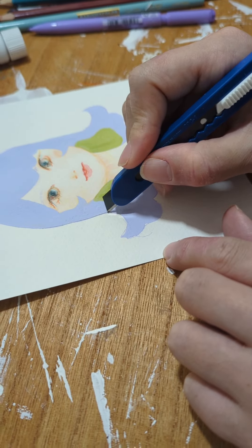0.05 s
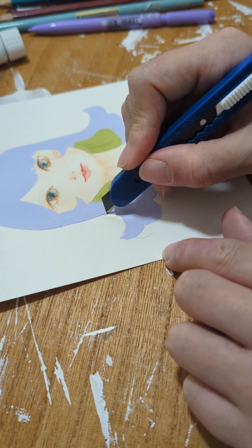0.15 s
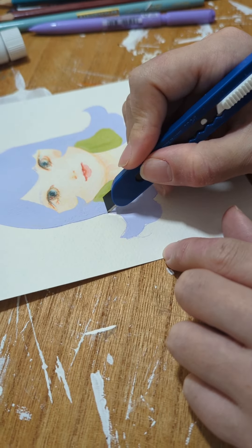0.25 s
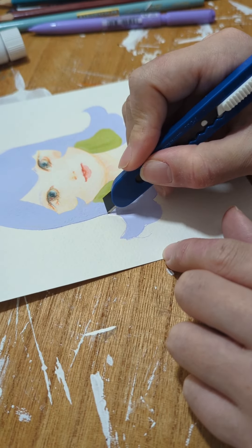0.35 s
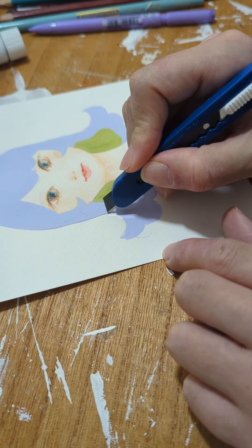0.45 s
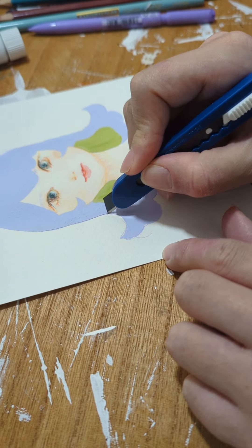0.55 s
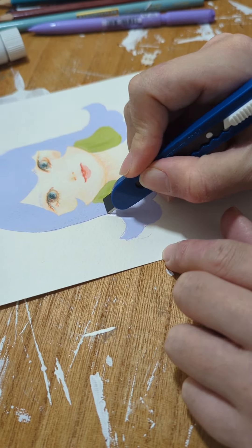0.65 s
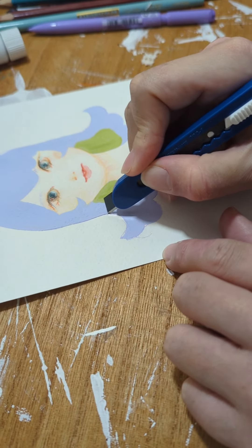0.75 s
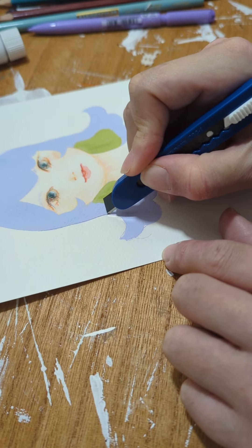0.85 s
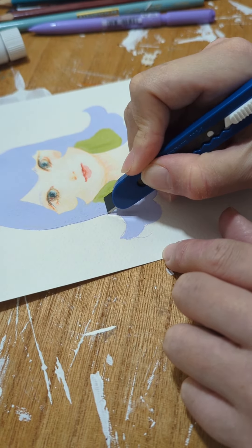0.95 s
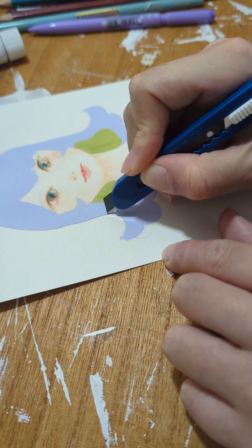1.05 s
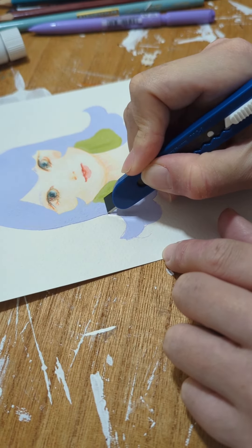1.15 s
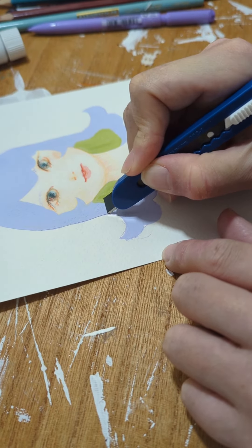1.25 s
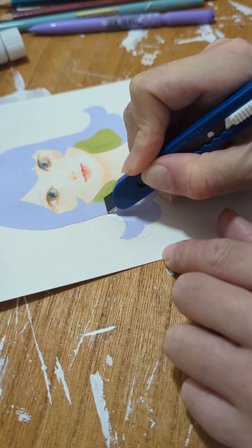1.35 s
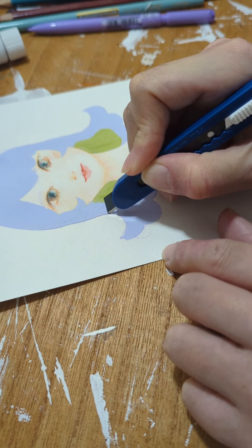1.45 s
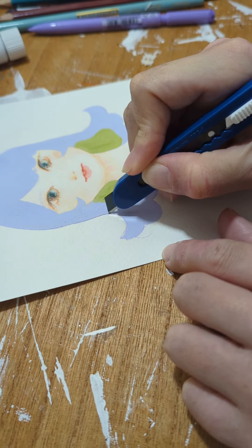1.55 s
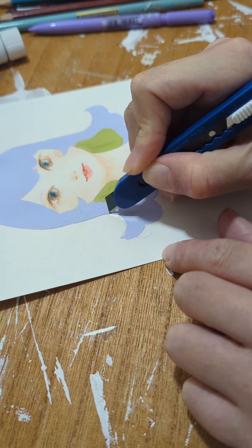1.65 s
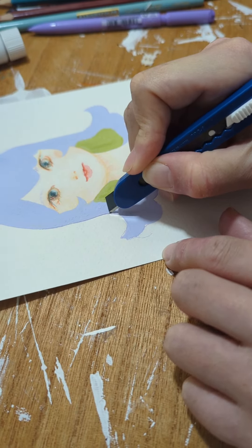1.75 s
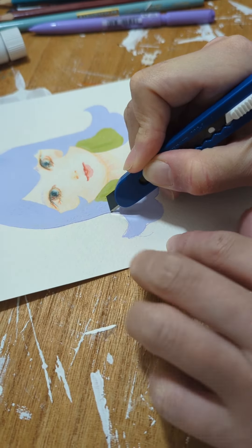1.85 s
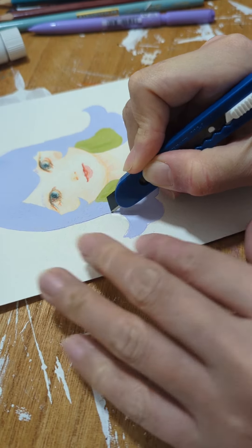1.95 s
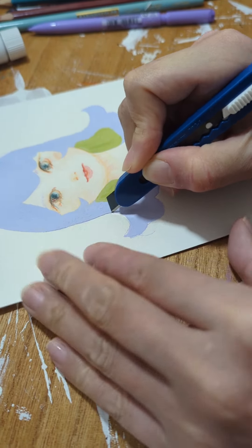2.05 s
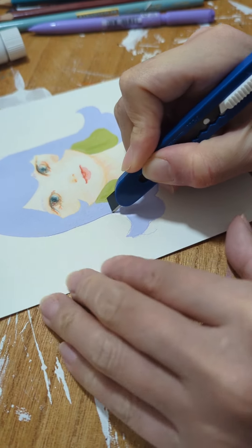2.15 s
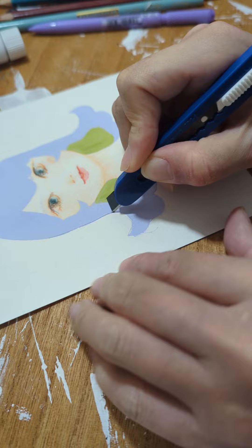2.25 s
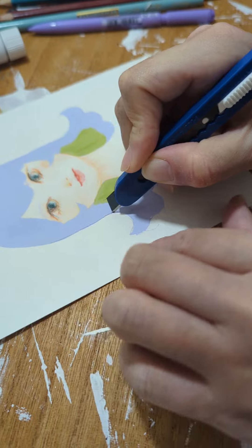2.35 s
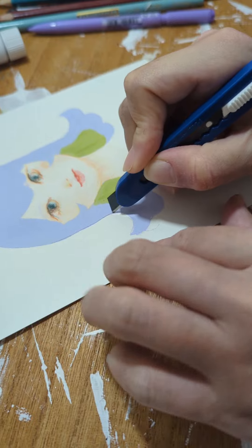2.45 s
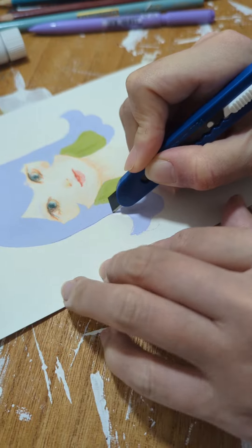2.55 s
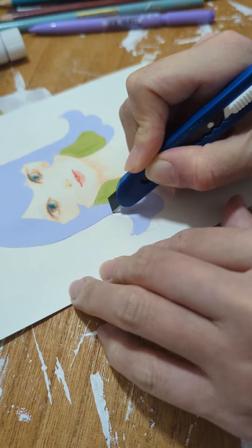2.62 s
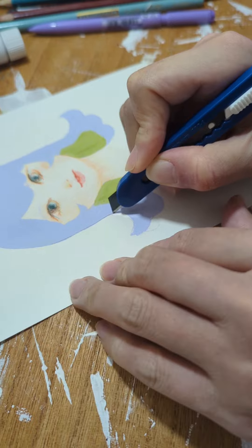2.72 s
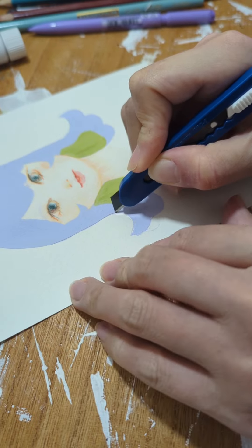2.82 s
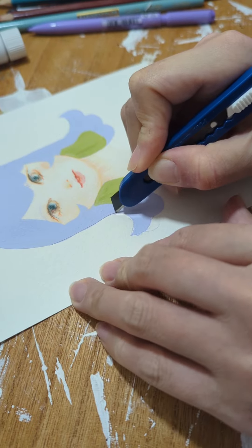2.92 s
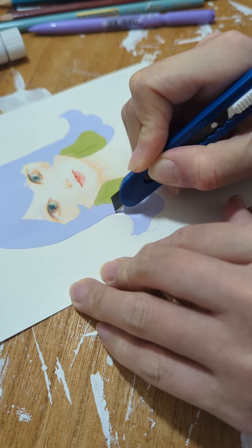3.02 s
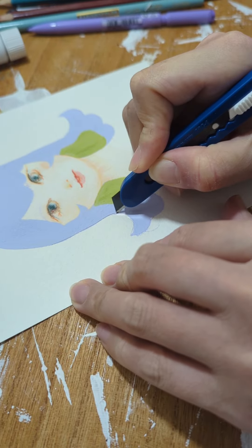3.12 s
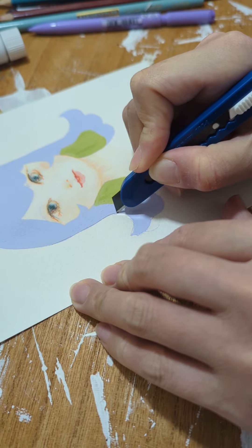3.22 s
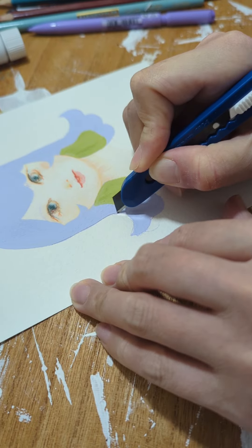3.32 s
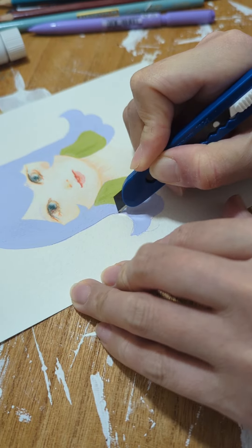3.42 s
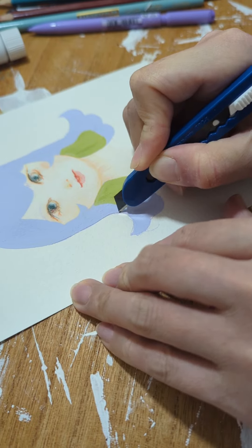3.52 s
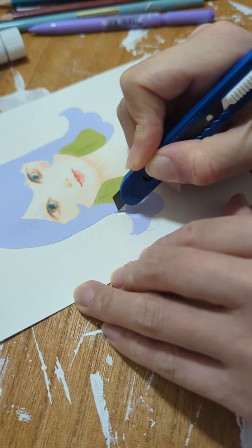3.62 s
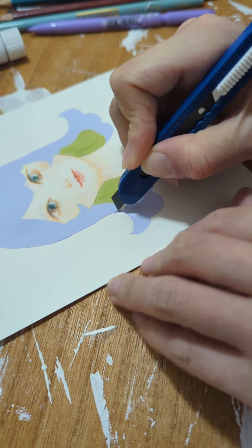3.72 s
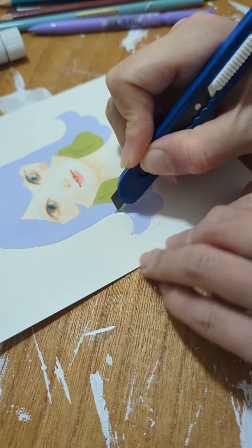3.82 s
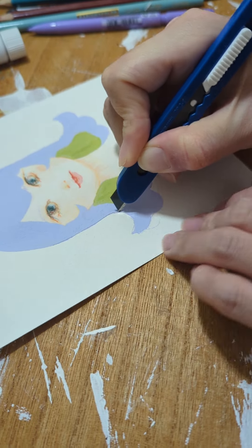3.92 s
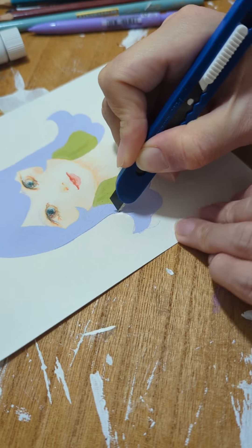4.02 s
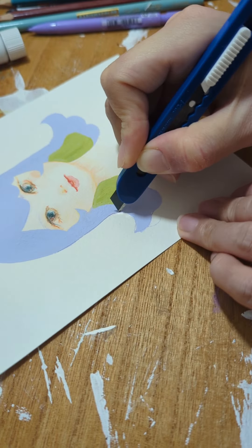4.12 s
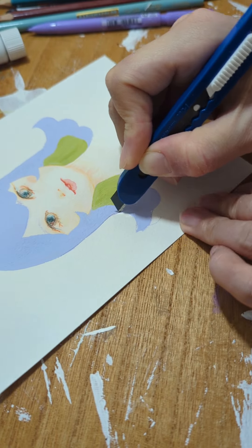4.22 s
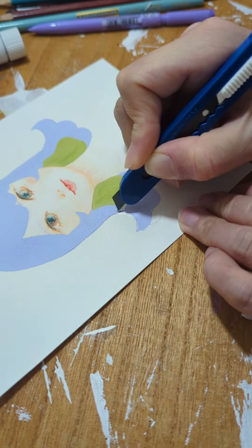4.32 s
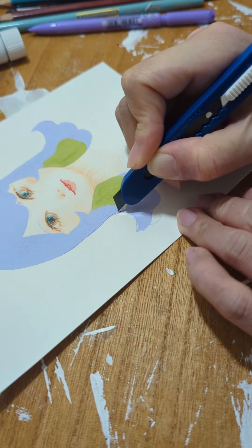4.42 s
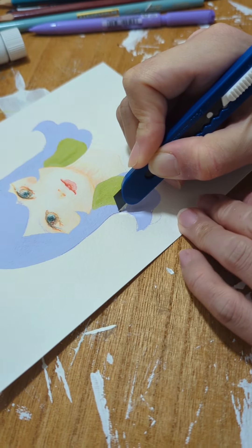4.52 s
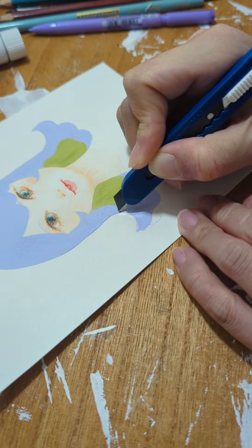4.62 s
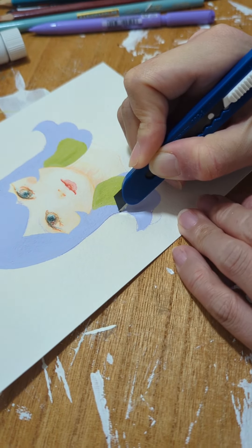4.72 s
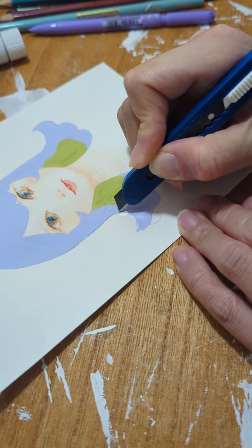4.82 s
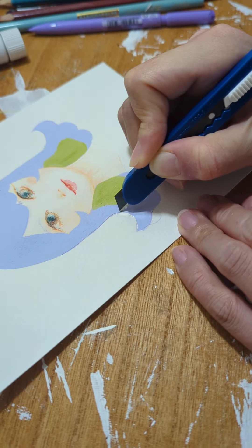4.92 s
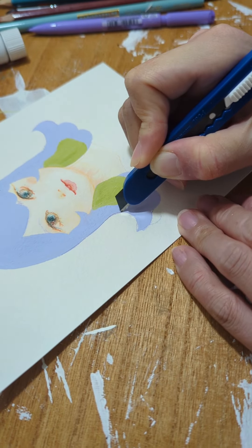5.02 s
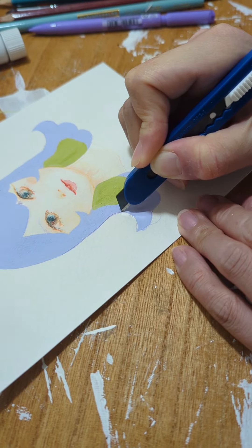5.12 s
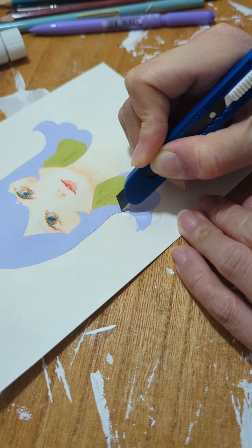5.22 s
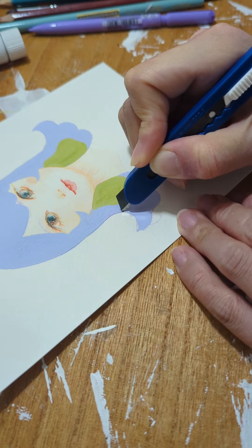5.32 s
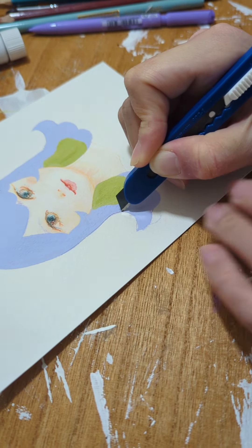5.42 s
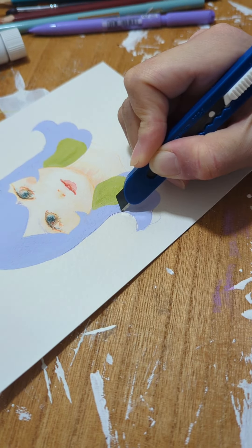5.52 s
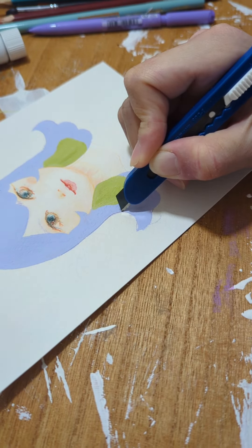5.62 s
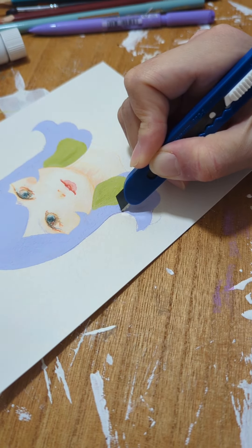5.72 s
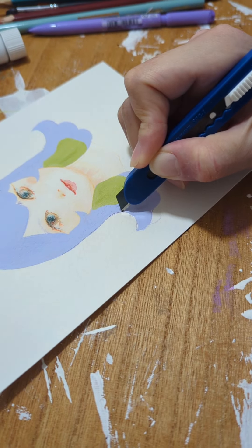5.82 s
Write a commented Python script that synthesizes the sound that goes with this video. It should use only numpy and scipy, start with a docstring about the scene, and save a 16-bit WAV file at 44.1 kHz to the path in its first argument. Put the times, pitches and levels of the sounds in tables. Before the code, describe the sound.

Close stereo pickup of a knife on thick paper over a wooden table indoors. Mostly quiet hiss with low table rumble; a few ticks, then the loudest crisp cuts and a soft hand bump around two seconds. The sheet rustles as it is turned, a slow cut sings very faintly, another cluster of scratches comes past four seconds, and a dry tap near the end.

```python
"""First a dull tap and a soft bump in a quiet, hissing room; then a knife jerks through thick paper on a
wooden table, close to a phone with two microphones. Fibres that catch and let go are random impulses that
ring the sheet, the table top, the paper body and the blade, in short jerks and in longer slides.
The blade tip ticks, taps ring the wood, and a slow cut sings faintly in two bands of filtered noise.
Below lie the rumble of a table rocked by the hands, decaying board tones and stereo hiss."""
import sys
import numpy as np
from scipy import signal
from scipy.fft import rfft, irfft, next_fast_len
from scipy.io import wavfile
from scipy.ndimage import uniform_filter1d

SR = 44100
rng = np.random.default_rng(int(sys.argv[2]) if len(sys.argv) > 2 else 0)


def to_wav(sig):
    """Store sig (one row per channel, or 1-D mono) as 16-bit WAV at the path in sys.argv[1].

    Samples outside -1..1 are clipped; the rate is SR.
    """
    pcm = np.clip(np.atleast_2d(sig), -1, 1) * 32767
    pcm = np.round(pcm).astype(np.int16)
    wavfile.write(sys.argv[1], SR, pcm.T)  # frames by channels


N = 258423
SECONDS = np.arange(N) / SR
SIZE = next_fast_len(N + 4000)  # transform length, with room for tails
HZ = np.arange(SIZE // 2 + 1) * SR / SIZE + 1  # raised by 1 Hz to keep clear of zero

# Resonances of the sheet in a jerk or a tick. Each row: centre in Hz, width in Hz, level in dB.
SHEET_MODES = [(1915, 770, 0.8), (2934, 1010, 3.3), (3890, 830, -1)]
# Resonances of the blade. Each row: centre in Hz, width in Hz, level in dB.
BLADE_MODES = [(6700, 6400, -1.5), (8330, 2000, 4.5), (11850, 2200, -5), (13800, 4300, -7)]


def undb(db):
    """Amplitude factor of a level in dB."""
    return 10 ** (np.asarray(db) / 20)


def unit(x):
    """Scale to an RMS of 1."""
    return x / np.sqrt(np.mean(x ** 2))


def over_time(points):
    """Straight lines through (s, value) points, at every sample."""
    return np.interp(SECONDS, *np.transpose(points))


def along(points):
    """Gain over frequency from (Hz, dB) points, straight on a log frequency axis."""
    hz, db = np.transpose(points)
    return undb(np.interp(np.log(HZ), np.log(hz), db))


def ring(x, response):
    """Pass x through a frequency response."""
    return irfft(rfft(x, SIZE) * response, SIZE)[..., :N]


def modal(modes):
    """Response of (Hz, width Hz, dB) resonances, each applied twice; their powers add."""
    power = 0
    for hz, width, db in modes:
        detuning = (HZ / hz - hz / HZ) * hz / width
        power = power + undb(2 * db) / (1 + detuning ** 2) ** 2
    return np.sqrt(power)


def walk(rate):
    """Random levels held for 1 / rate s and slewed twice; RMS 1."""
    hold = int(SR / rate)
    steps = np.repeat(rng.standard_normal(N // hold + 1), hold)
    smooth = uniform_filter1d(uniform_filter1d(steps, hold), hold)
    return unit(smooth[:N])


def friction(forces, sheet_modes, rate, spread_db, stutter_db, stutter_rate):
    """Fibres at both ends of the contact let go at random with very unequal force; the grip stutters."""
    # Table top under the cut. Each row: centre in Hz, width in Hz, level in dB.
    top_modes = [(226, 177, 0), (281.4, 23.3, 9), (470, 320, -5)]
    # Body of the paper. Each row: centre in Hz, width in Hz, level in dB.
    body_modes = [(587, 130, -5), (972, 410, 1), (1370, 270, 2.6)]
    lets_go = rng.random((2, N)) < rate / SR  # rate in fibres per second
    strength_db = spread_db * np.minimum(rng.exponential(size=(2, N)), 6)
    fibres = lets_go * undb(strength_db) * np.sign(rng.standard_normal((2, N)))
    fibres = unit(fibres * undb(stutter_db * walk(stutter_rate)))
    out = 0
    for force, modes in zip(forces, (sheet_modes, top_modes, body_modes, BLADE_MODES)):
        response = modal(modes)
        response = response / np.sqrt(np.mean(response ** 2))
        out = out + ring(fibres * force, response)
    return out


def jerk_force(bite_s=0.0032, fall_s=0.012, blade_fall_s=0.007, long_s=0.018, firm_db=-45, creep_in=0.012):
    """A firm jerk bites at once, a weak one creeps in; each holds and dies away, the blade first.

    A jerk shorter than long_s dies away sooner.
    """
    # Short slips of blade and sheet. Each row: start in seconds, length in seconds, sheet drive in dB,
    # paper body and blade drive in dB relative to the sheet.
    slips = [(0.281, 0.013, -60, -13, 4.5), (0.305, 0.035, -72, 0, -4), (0.587, 0.023, -69.5, -1.5, -5),
             (1.583, 0.008, -60, 2, -10), (1.82, 0.012, -64, -1, -4), (1.85, 0.115, -54.5, -4.5, 4),
             (1.898, 0.036, -32.5, -11.5, -4.5), (2.066, 0.0059, -60, -13, -4),
             (2.106, 0.037, -58, -5.5, -2), (2.352, 0.02, -36.5, -10.5, -15),
             (2.374, 0.024, -49.5, 1.5, -5.5), (2.409, 0.06, -74, 2.5, 3), (2.786, 0.047, -62, 3.5, -4),
             (2.825, 0.029, -65, 5.5, 5), (3.088, 0.021, -59.5, -4, -10.5), (3.121, 0.0061, -56, 0.5, 0),
             (3.33, 0.0041, -59, 3.5, -4.5), (3.442, 0.056, -60.5, 4.5, 0), (3.495, 0.02, -66.5, 2, 5.5),
             (3.643, 0.0094, -68, 2, -12), (4.161, 0.018, -56.5, -6, -8), (4.174, 0.027, -40, -13, -12),
             (4.195, 0.028, -35.5, -9.5, -9.5), (4.223, 0.014, -46, 7.5, -3.5),
             (4.238, 0.013, -57, 13, -17), (4.323, 0.027, -61.5, -0.5, -7.5), (4.609, 0.011, -66, 5, -5),
             (4.877, 0.019, -60.5, -2, -11), (5.019, 0.013, -64, -2, -17), (5.04, 0.0081, -64.5, 6.5, -22),
             (5.064, 0.019, -61.5, 0, -11), (5.095, 0.016, -60.5, 5, -8), (5.166, 0.023, -60.5, -4, -3.5),
             (5.4, 0.031, -68, -21, 0), (5.428, 0.009, -63, -4.5, 1), (5.543, 0.018, -64, 12.5, -4.5)]
    # How much reaches the table top, most while the hand comes down on the sheet.
    # Each row: time in seconds, level in dB relative to the paper body.
    top_share = [(0, 0), (1.75, -10), (1.9, 3), (2.45, -4.5), (2.8, -9), (4.5, -19), (5.05, -20.5),
                 (5.55, -1)]
    power, t = np.zeros((4, N)), np.arange(6000) / SR
    falls_s = np.array([[fall_s], [fall_s], [fall_s], [blade_fall_s]])
    for s, length, db, body_db, blade_db in slips:
        top_db = body_db + np.interp(s, *np.transpose(top_share))
        rise_s = bite_s + length * np.clip(creep_in * (firm_db - db), 0, 1)
        bite = np.sin(np.pi / 2 * np.minimum(t / rise_s, 1)) ** 2
        fall = np.exp(-np.maximum(t - length, 0) / (min(1, length / long_s) * falls_s))
        drive = undb(db + np.array([[0], [top_db], [body_db], [blade_db]]))
        start = int(s * SR)
        power[:, start:start + len(t)] += (drive * bite * fall) ** 2  # overlapping jerks add in power
    return np.sqrt(power)


def slide_force():
    """Drive of sheet, table top, paper body and blade while the sheet slides over the wood."""
    # One list per slide. Each row: time in seconds, sheet drive in dB, blade in dB relative to the sheet.
    glides = [
        [(1.99, -67, 2), (2.04, -71, 4), (2.09, -69.5, 4), (2.17, -57.5, 0), (2.23, -57.5, 1), (2.3, -50.5, -2),
         (2.345, -56, 2)],
        [(2.89, -70, -1), (2.96, -71, -33), (3.18, -75, -15), (3.3, -96, -21)],
        [(3.59, -76, -9), (3.69, -57.5, -3.5), (3.745, -56.5, -1), (3.79, -64, 7), (3.86, -67, 17),
         (3.93, -66, 11), (4.0, -66, 13.5), (4.06, -68, 8), (4.15, -66.5, -7)],
    ]
    # Steady drag through each slide. Each row: table top drive in dB, paper body drive in dB.
    drag = [(-71.5, -73.5), (-79, -79.5), (-83, -69.5)]
    out = np.zeros((4, N))
    for rows, (top_db, body_db) in zip(glides, drag):
        s, db, blade_db = np.transpose(rows)
        inside = (SECONDS > s[0]) & (SECONDS < s[-1] + .012)
        out[0, inside] = undb(np.interp(SECONDS[inside], s, db))
        out[1, inside] = undb(top_db)
        out[2, inside] = undb(body_db)
        out[3, inside] = undb(np.interp(SECONDS[inside], s, db + blade_db))
    return uniform_filter1d(out, size=400)


def ticks(fade_s=0.00072):
    """The blade tip snaps a fibre: a broad, bright noise crack that rings sheet and blade."""
    # Snaps at the blade tip. Each row: start in seconds, drive in dB.
    snaps = [(0.284, -44), (0.289, -28), (0.2957, -35.5), (0.434, -53), (1.5886, -48), (1.917, -22),
             (1.937, -19), (3.1252, -37.5), (3.9401, -37), (4.0005, -38), (4.4371, -39.5), (5.5361, -29)]
    x, t = np.zeros(N), np.arange(600) / SR
    swell = t / fade_s * np.exp(1 - t / fade_s)
    for s, db in snaps:
        start = int(s * SR)
        x[start:start + len(t)] += undb(db) * rng.standard_normal(len(t)) * swell
    broad = modal([(5000, 3660, 0)])
    return ring(x, undb(-9.0) * modal(SHEET_MODES) + undb(-0.5) * broad + undb(-34) * modal(BLADE_MODES))


def taps(rise_s=0.00054):
    """Dull taps ring the modes of the wood; a softer contact leaves more bass."""
    # Taps on the wood. Each row: start in seconds, drive in dB, bass tilt about 700 Hz in dB per octave.
    knocks = [(0.026, -63.5, 2), (1.826, -59, 0.5), (1.881, -48, 13.5), (1.943, -48, 14), (2.105, -68, -3),
              (2.829, -53, 4), (2.843, -62, 7), (2.852, -56, 5), (3.471, -57, 1), (3.48, -55, 3),
              (4.437, -58, 3), (5.544, -39.5, 2)]
    # Modes of the wood. Each row: frequency in Hz, level in dB, time to fall 60 dB in seconds.
    wood_modes = [(298, -11.5, 0.18), (374, -23, 0.069), (689, -4.5, 0.11), (830, -8, 0.14),
                  (1170, -13, 0.055), (1390, 17.5, 0.014), (2240, 2.5, 0.047)]
    x, t = np.zeros(N), np.arange(8000) / SR
    rise = 1 - np.exp(-t / rise_s)
    for s, db, bass_db in knocks:
        start = int(s * SR)
        for hz, mode_db, t60 in wood_modes:
            gain = undb(db + mode_db - bass_db * np.log2(hz / 700))
            tone = np.sin(2 * np.pi * hz * t + rng.standard_normal())
            x[start:start + len(t)] += gain * tone * 1000. ** (-t / t60) * rise
    return x


def creep(flicker_db=1.0):
    """A slow cut drags steadily and keeps two narrow resonances sounding."""
    # The blade creeping through the paper. Each row: time in seconds, drive in dB.
    drag_level = [(2.6, -92), (2.68, -86), (2.78, -90), (2.9, -68.5), (3.05, -69.5), (3.25, -73),
                  (3.4, -82)]
    # The two singing bands. Each row: centre in Hz, width in Hz, level in dB.
    bands = [(418, 93, 2), (2790, 130, -5)]
    s, db = np.transpose(drag_level)
    level_db = np.interp(SECONDS, s, db, left=-140, right=-140)
    singing = unit(ring(rng.standard_normal(N), modal(bands)))
    return singing * undb(level_db + flicker_db * walk(24.45))


def ports(x, lag, mirror=(0, -99), tail_s=0.0052, tail_db=0., shade_hz=2700.0, colour=0.77):
    """Each port hears the direct sound, shaded in the treble, and its own reflections off table and hands.

    lag: samples by which the right port is late; mirror: a nearby hand's echo (ms late, dB).
    """
    # Balance of the two microphone ports. Each row: frequency in Hz, left minus right in dB.
    balance = [(300, 0.5), (700, 1.5), (1300, 1.5), (2400, -4.5), (4400, -2.5), (8100, -3.5), (12000, 4),
               (15000, 16)]
    t = np.arange(4000) / SR
    echo = rng.standard_normal((2, len(t))) * np.exp(-t / tail_s)
    echo = echo / np.sqrt(np.sum(echo ** 2, axis=1, keepdims=True))
    echo = rfft(echo, SIZE) * HZ / (HZ + 700)
    direct = np.exp(-2j * np.pi * HZ * np.array([[0], [lag]]) / SR) / (1 + 1j * HZ / shade_hz)
    path = direct + undb(tail_db) * echo
    # the contact is wide and moves, so one path's peaks and dips mostly even out, more so in the treble
    path = path * abs(path) ** (colour / (1 + HZ / 6000) - 1)
    late_ms, mirror_db = mirror
    bounce = undb(mirror_db) / (1 + (HZ / 6500) ** 4)  # skin returns little treble
    reflected = 1 + bounce * np.exp(-2j * np.pi * HZ * late_ms / 1000)
    path = path * reflected / np.sqrt(1 + bounce ** 2)
    lean = np.sqrt(along(balance))
    mean = np.sqrt((lean ** 2 + lean ** -2) / 2)
    return ring(x, path * np.array([lean, 1 / lean]) / mean)


def cutting():
    """All knife and paper sounds at the two ports; reflections change as the hands shift."""
    # A gliding sheet rasps in one band. Each row: centre in Hz, width in Hz, level in dB.
    sliding_modes = [(1800, 1200, -8), (2870, 850, 2), (4100, 900, -6)]
    # Extra delay to the right port, in samples: near end, far end of the contact.
    lags = (14, 5)
    # Moments when the hands shift, in seconds.
    shifts = [1.0, 2.02, 2.6, 3.3, 4.14, 4.7, 5.3]
    # Echo off a hand close to the blade: delay in ms, level in dB.
    hand_mirror = (0.452, -1.3)
    # Where the hands work. Each row: time in seconds, left minus right in dB.
    lean_points = [(0, 0.5), (1.9, -1.5), (2.8, -0.5), (4.2, 0), (5.86, -2.5)]
    jerking = friction(jerk_force(), SHEET_MODES, rate=6400, spread_db=2.0, stutter_db=1.0, stutter_rate=230)
    sliding = friction(slide_force(), sliding_modes, rate=5000, spread_db=2.0, stutter_db=1.5, stutter_rate=110)
    near, far = jerking + sliding
    near = near + taps() + creep()
    out = ports(ticks(), lags[0], tail_s=0.0051, tail_db=-3)
    pose = np.searchsorted(shifts, SECONDS)
    for k in range(len(shifts) + 1):
        held = np.sqrt(uniform_filter1d(1. * (pose == k), size=2000))  # equal-power crossfade
        mirror = hand_mirror if k == 5 else (0, -99)  # in pose 5 the hand lies close to the blade
        out = out + undb(-0.5) * ports(near * held, lags[0], mirror)
        out = out + undb(-2.5) * ports(far * held, lags[1], mirror)
    pan_db = over_time(lean_points)
    return out * undb(np.array([pan_db, -pan_db]) / 2)


def thuds(rise_s=0.003, cycles=17):
    """A hand bumps the board: soft low tones that fall 60 dB in a set number of cycles."""
    # Bumps on the board. Each row: start in seconds, drive in dB, frequency in Hz.
    bumps = [(0.027, -53.5, 335), (0.29, -55.5, 178), (0.477, -63, 139), (0.6, -56.5, 136),
             (0.733, -54.5, 131), (0.816, -54.5, 115), (1.235, -60, 335), (1.715, -46.5, 117),
             (1.899, -41.5, 152), (2.157, -47, 101), (2.338, -44.5, 147), (3.093, -60, 133),
             (4.555, -54, 110), (4.618, -54, 106), (5.664, -49, 115), (5.764, -53.5, 114)]
    x, t = np.zeros(N), np.arange(3000) / SR
    for s, db, hz in bumps:
        start = int(s * SR)
        tone = np.sin(2 * np.pi * hz * t) * (1 - np.exp(-t / rise_s))
        x[start:start + len(t)] += undb(db) * tone * 1000. ** (-t * hz / cycles)
    return x


def rocking(alike=0.4, board_db=-1.4, board_follow=0.77, rest_db=-72):
    """Hands lean on the table: noise in the low modes of legs and board; the board follows in part."""
    # How hard the hands rock the table. Each row: time in seconds, drive of the legs in dB.
    leaning = [(0, -73), (0.42, -79), (0.7, -69), (1.4, -87), (1.55, -80), (1.68, -65), (1.8, -69),
               (1.92, -52), (2.05, -74), (2.18, -55), (2.28, -65), (2.4, -62), (2.55, -77), (2.9, -64.5),
               (3.05, -78), (3.5, -66.5), (4.4, -74.5), (4.62, -65.5), (4.8, -78.5), (5.07, -71.5),
               (5.5, -78), (5.86, -70.5)]
    legs_db = over_time(leaning)
    follow_db = rest_db + board_db + board_follow * (legs_db - rest_db)
    legs_modes, board_modes = [(53.7, 27, 0)], [(118.8, 51, -5.0), (168.4, 15, -8)]  # (Hz, width Hz, dB)
    out = 0
    for db, modes in ((legs_db, legs_modes), (follow_db, board_modes)):
        mid = unit(ring(rng.standard_normal(N), modal(modes)))
        side = unit(ring(rng.standard_normal(N), modal(modes)))
        width = np.sqrt((1 - alike) / (1 + alike))  # alike: correlation of the two ports
        out = out + (mid + width * side * np.array([[1], [-1]])) * undb(db)
    return out * undb(np.array([[-1.2], [1.2]]) + 2.8 * walk(7))


def room():
    """Air and microphone hiss, unrelated at the two ports; the right port lifts 8 kHz."""
    # Colour of the hiss. Each row: frequency in Hz, relative density in dB.
    hiss_colour = [(120, -38), (160, -21), (220, -14.5), (340, -16.5), (600, -19), (950, -16.5),
                   (1300, -13.5), (2400, -14), (4000, -19), (6500, -21), (9500, -31), (15800, -38.5)]
    # The hiss swells a little. Each row: time in seconds, level in dB.
    swell = [(0, -70), (1.5, -69), (3, -64.5), (5.86, -65.5)]
    lift = along([(4500, 0), (8100, 5.0), (12000, -0.5)])
    hiss = ring(rng.standard_normal((2, N)), along(hiss_colour) * np.array([1 / lift, lift]))
    return unit(hiss) * undb(over_time(swell) + .5 * walk(3.49))


def scene():
    """The knife work close by, the bumped and rocking table, and the room behind."""
    return cutting() + thuds() + rocking() + room()


def record(dry):
    """The phone cuts the deepest bass below 37 Hz and the top above 15.9 kHz."""
    bass_cut = signal.butter(3, 37, "high", fs=SR, output="sos")
    top_cut = signal.ellip(10, .2, 75, 15900, fs=SR, output="sos")
    return signal.sosfilt(top_cut, signal.sosfilt(bass_cut, dry))


dry = scene()
out = record(dry)
to_wav(out)
```